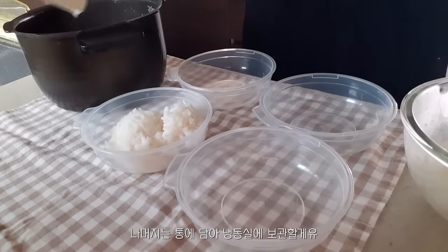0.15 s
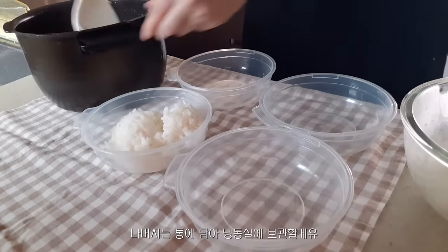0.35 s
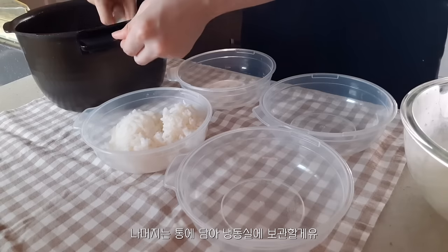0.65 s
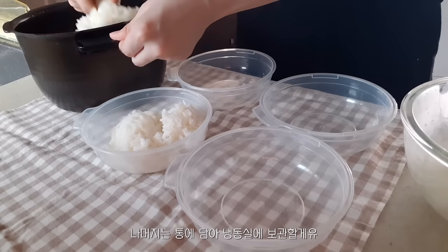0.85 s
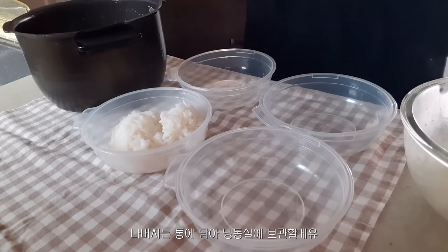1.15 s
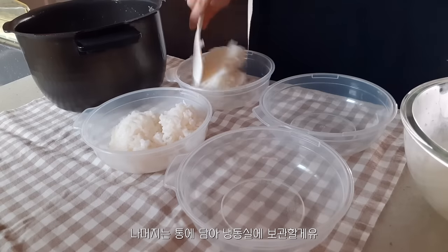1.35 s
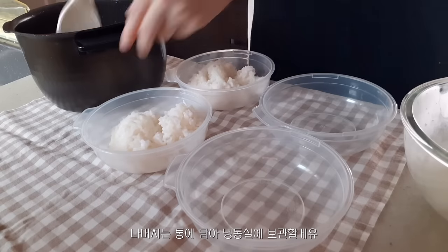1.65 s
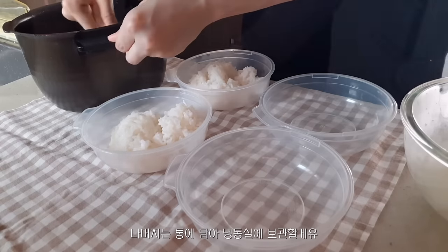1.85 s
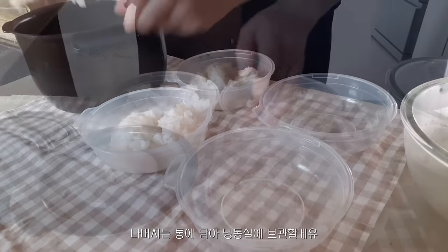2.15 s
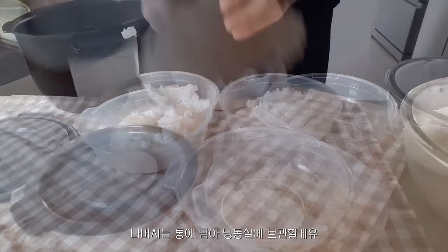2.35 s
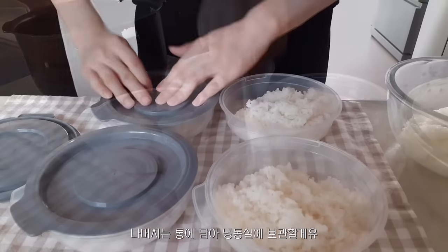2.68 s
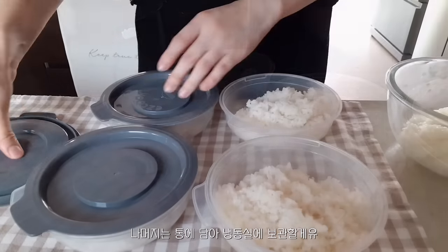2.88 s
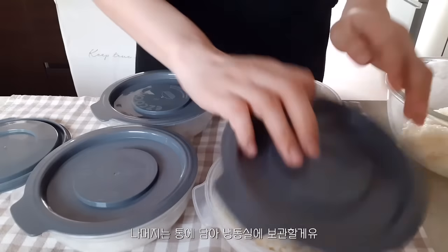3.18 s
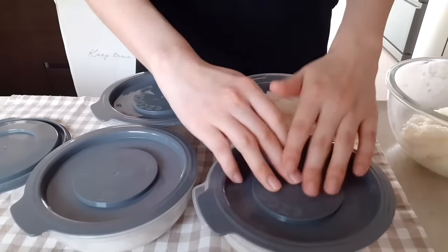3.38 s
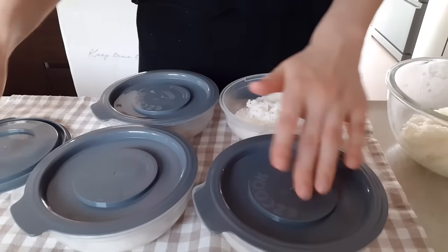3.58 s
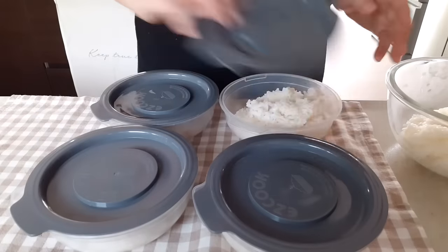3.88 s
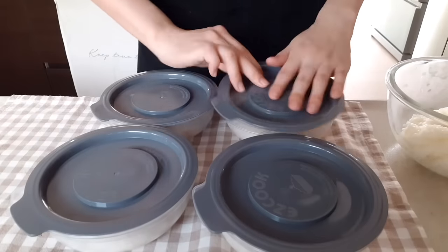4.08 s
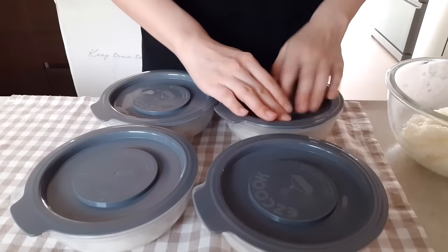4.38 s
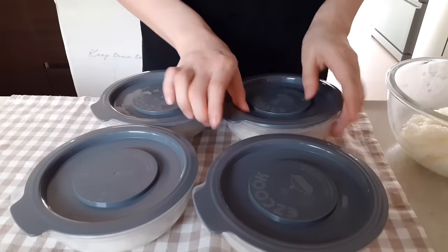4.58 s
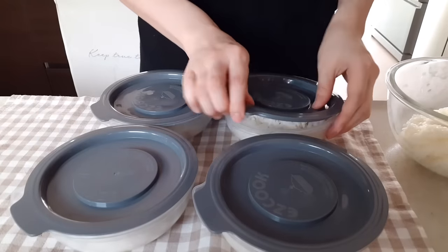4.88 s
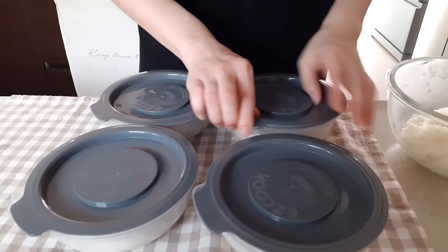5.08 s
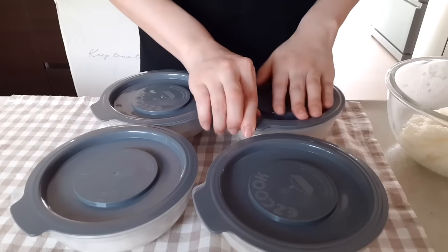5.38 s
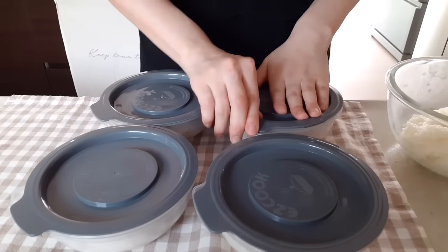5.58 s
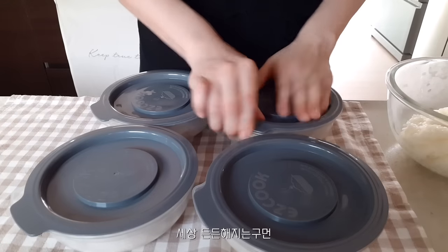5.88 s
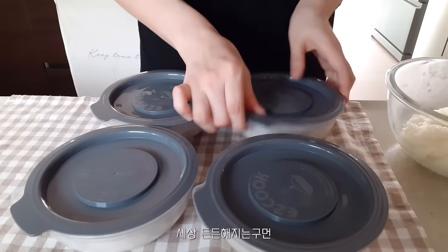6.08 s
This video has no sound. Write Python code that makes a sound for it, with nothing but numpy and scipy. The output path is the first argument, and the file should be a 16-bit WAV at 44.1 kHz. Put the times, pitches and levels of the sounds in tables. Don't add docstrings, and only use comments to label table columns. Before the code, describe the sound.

Plastic lids clatter, snap and squeak onto full rice tubs in quick sped-up bursts, then softer, slower presses over faint kitchen and fridge hum.

```python
import sys
import numpy as np
from scipy import signal
from scipy.io import wavfile
from scipy.ndimage import uniform_filter1d

SR = 44100
rng = np.random.default_rng(int(sys.argv[2]) if len(sys.argv) > 2 else 0)


def unload_audio(sound):
    columns = np.transpose(np.atleast_2d(sound))
    steps = np.round(np.clip(columns, -1, 1) * 32767)
    wavfile.write(sys.argv[1], SR, steps.astype(np.int16))


def to_linear_factor(level_db):
    exponent = np.asarray(level_db, float) / 20
    return 10 ** exponent


N = 274743


def evened(x):
    return x / np.sqrt(np.mean(x ** 2) + 1e-20)


def read(points, hz):
    f, value = np.transpose(points)
    return np.interp(np.log(hz + 1), np.log(f + 1), value)


def add(mix, s, sound):
    part = mix[:, round(s * SR):][:, :sound.shape[1]]
    part += sound[:, :part.shape[1]]


def pan(left_over_right_db):
    return to_linear_factor([[left_over_right_db / 2], [-left_over_right_db / 2]])


def band(x, lo_hz, hi_hz):
    return signal.sosfilt(signal.butter(2, [lo_hz, min(hi_hz, SR / 2.1)], "band", fs=SR, output="sos"), x)


def highpass(x, hz):
    return signal.sosfilt(signal.butter(2, hz, "high", fs=SR, output="sos"), x)


def resonate(x, hz, width_hz):
    turn = np.exp(2j * np.pi * np.cumsum(hz * np.ones(len(x))) / SR)
    r = np.exp(-np.pi * width_hz / SR)
    return 2 * (turn * signal.lfilter([1 - r], [1, -r], x / turn)).real


# (start [s], end [s])
FAST_S = (.628, 4.293)


def is_fast():
    t = np.arange(N) / SR
    return (t > FAST_S[0]) & (t < FAST_S[1])


# (frequency [Hz], side re mid [dB])
WIDE = [(60, -15.5), (180, -11.5), (550, -7), (1650, 0.5), (4970, 1.5), (15000, 1)]
BODY_WIDE = [(60, -5), (180, -14), (550, -13.5), (1650, -2), (4970, 2), (15000, 0)]


def hiss(colour, wide, patchy_db):
    frames, hz = N // 256 + 5, np.fft.rfftfreq(1024, 1 / SR)
    a, b, c, d, patches = rng.standard_normal((frames, 513, 5)).T
    patches = uniform_filter1d(patches, size=10, axis=0)
    patches = evened(uniform_filter1d(patches, size=12, axis=1))
    z = np.array([a + 1j * b, to_linear_factor(read(wide, hz))[:, None] * (c + 1j * d)])
    z = z * to_linear_factor(read(colour, hz)[:, None] + patchy_db * patches)
    mid, side = signal.istft(z, nperseg=1024, noverlap=768)[1][:, :N]
    return np.array([mid + side, mid - side]) / np.std(mid)


# (frequency [Hz], width [Hz], level [dB])
LID_MODES = [(700, 37, 1.5), (806, 90, -12), (1200, 1100, 11.5), (1700, 660, -7.5), (2070, 510, 10.5),
             (2808, 220, -12.5), (3600, 810, 8.5), (5000, 480, 2), (6760, 4500, 23), (9290, 400, -54)]


def snap(row, luck, pace, lid_db, pan_db, rattle_s):
    s, peak_db, hz, tick_db = row
    t, tick_hz = np.arange(2048) / SR, 1500 + 1500 * pace
    tooth, gap, wobble = luck[:2048], luck[2048:4096], luck[4096:]

    fade = np.exp(-t / (rattle_s * to_linear_factor(0.27 * (-25 - peak_db))))
    rattle = np.tanh(tooth) * (abs(gap) > .75) * fade
    drive = 0.39 * rattle + (t == 0)

    ring = resonate(drive, hz, hz / 3.2)
    modes, sign = 0, 1
    for (mode_hz, width_hz, db), g in zip(LID_MODES, wobble):
        f, width = mode_hz * pace / 2, width_hz * pace / 2
        near_db = -6.5 * abs(np.log2(f / hz))
        modes += sign * to_linear_factor(db + near_db + 2 * g) * resonate(drive, f * (1 + 0.01 * g), width) / width_hz
        sign = -sign
    body = ring / abs(ring).max() + to_linear_factor(lid_db) * modes / abs(modes).max()
    body = band(body, .3 * hz, max(2.6 * hz, tick_hz))
    body = to_linear_factor(peak_db - 1) * body / abs(body).max()

    aside = 2.2 * gap * (abs(tooth) > 1.3) * fade
    dull = np.exp(-2 * np.pi * 6340 / SR)
    tick = signal.lfilter([1], [1, -dull], [drive + .3 * aside, drive - .3 * aside])
    tick = band(tick, .6 * tick_hz, 15300)
    tick = to_linear_factor(peak_db + min(tick_db, 6)) * tick / abs(tick).max()

    pan_db = np.clip(pan_db + 1.5 * gap[-1], -8, 8)
    lag = round(-4 / pace - .6 * pan_db)
    body = np.array([np.roll(body, max(lag, 0)), np.roll(body, max(-lag, 0))])
    return s, (body - tick) * pan(pan_db)


# (time [s], peak [dB], main
# ring [Hz], tick re peak [dB])
SCOOP = [(0.644, -57, 380, -23), (0.955, -64, 260, -22), (1.734, -43.5, 410, 3.5), (1.809, -25, 1630, 6),
         (1.814, -23, 3500, -22), (1.834, -49, 800, -11), (1.929, -48, 780, -5), (2.039, -38, 3600, -5),
         (2.052, -24, 3550, -10), (2.056, -36, 1200, -19), (2.077, -24.5, 3800, -34),
         (2.091, -40.5, 840, 9), (2.148, -28.5, 3600, -29), (2.23, -53, 700, 18), (2.26, -38, 3850, -5),
         (2.274, -43.5, 1020, 10), (2.285, -38.5, 690, -8), (2.303, -42.5, 1640, 13), (2.372, -48, 3770, 0),
         (2.399, -37.5, 4070, -1.5)]
FIRST_LIDS = [(2.444, -16.5, 2880, -9), (2.451, -23, 2580, -10), (2.489, -24, 2820, -16),
              (2.513, -21, 2700, -5), (2.527, -14.5, 2870, -1.5), (2.588, -36, 1750, -7),
              (2.609, -8.5, 1566, -3), (2.809, -23.5, 3200, -2), (2.843, -32, 1320, 0),
              (2.85, -31, 1800, -7), (2.864, -45, 1760, 25), (2.874, -18, 5000, 1), (2.996, -47, 3310, -10),
              (3.011, -26, 1200, 5), (3.122, -30, 2580, -14), (3.142, -41.5, 2200, 9)]
NEAR_LID = [
    (3.218, -18, 1990, 1),
    (3.229, -31.5, 1900, -12.5),
    (3.336, -15, 2000, -1),
    (3.348, -20.5, 2870, -6),
    (3.457, -23.5, 1780, -18.5),
    (3.461, -14.5, 1600, -1),
    (3.586, -48.5, 2480, -3.5),
    (3.604, -42, 1000, -9),
    (3.625, -37, 750, -14),
]
LID_CATCHES = [(3.78, -37, 3080, -17), (3.785, -21, 3900, -5), (3.799, -35, 3400, 8), (3.877, -49, 4970, 3),
               (3.894, -18.5, 3370, 0), (3.969, -29, 900, 19), (3.992, -32, 900, -14), (4.021, -36, 910, 5.5),
               (4.028, -23.5, 2480, -5.5), (4.051, -26, 2150, -2.5), (4.083, -26.5, 2330, -2.5),
               (4.129, -20, 2320, -9.5), (4.157, -35, 2060, -14), (4.189, -25.5, 3480, -5),
               (4.194, -23.5, 2230, -13),
               (1.819, -15, 3800, -8.5),
    (2.141, -35, 1000, 5),
    (3.982, -29, 2500, -12),
]
PRESS = [(4.347, -52, 1395, -5.5), (4.381, -45.5, 1513, -27.5), (4.412, -50, 962, -16),
         (4.698, -58, 973, -16), (4.727, -51.5, 1048, 4), (4.987, -21.5, 1200, -22),
         (5.05, -37.5, 1565, -18.5), (5.057, -37.5, 987, -16.5), (5.168, -38, 1300, -24.5),
         (5.19, -43.5, 1060, -19), (5.254, -41.5, 980, -28), (5.262, -47, 1100, -23),
         (5.388, -29.5, 1400, -22), (5.454, -42.5, 1450, -19), (5.477, -36, 950, -10),
         (5.487, -35, 890, -2.5), (5.491, -31.5, 947, 0), (5.605, -37.5, 1240, -3), (5.611, -24, 642, -6),
         (5.822, -49, 1840, -3), (5.863, -22, 2630, 6), (5.89, -33.5, 1280, -25), (6.002, -42, 1170, 17),
         (6.007, -42.5, 1200, 11), (6.127, -39, 1340, 5), (6.141, -33, 1500, 4.5)]


def snaps(rows, pace, lid_db, pan_db, rattle_s):
    out = np.zeros((2, N))
    for row, luck in zip(rows, rng.standard_normal((len(rows), 4096 + len(LID_MODES)))):
        add(out, *snap(row, luck, pace, lid_db, pan_db, rattle_s))
    return out


# (time [s], frequency [Hz], peak [dB], t60 [s])
RINGS = [(0.888, 3400, -59, 0.073), (0.892, 7300, -63, 0.044), (1.814, 1450, -25.5, 0.035),
         (1.815, 4900, -31, 0.03), (1.815, 3750, -26.5, 0.023), (1.815, 3000, -33, 0.048),
         (1.818, 790, -31.5, 0.033), (1.818, 6800, -63, 0.027), (2.053, 3800, -51, 0.026),
         (2.077, 3100, -43, 0.033), (2.077, 3850, -47, 0.036), (2.092, 4200, -49, 0.018),
         (2.148, 3100, -49, 0.014), (2.165, 3200, -52, 0.015), (2.287, 750, -46, 0.025),
         (2.444, 3100, -22.5, 0.014), (2.446, 2550, -29, 0.042), (2.446, 1200, -37, 0.088),
         (2.513, 3200, -25, 0.011), (2.527, 3100, -31, 0.014), (2.53, 2000, -32.5, 0.053),
         (2.61, 684, -31, 0.067), (2.61, 571, -35, 0.042), (2.61, 1195, -29.5, 0.093),
         (2.612, 1900, -29.5, 0.092), (2.612, 2374, -27, 0.033), (2.61, 4893, -28.5, 0.027),
         (2.622, 1750, -30.5, .04), (2.809, 1750, -37, 0.057), (2.809, 3700, -49, 0.15),
         (2.823, 2400, -40.5, .03), (2.874, 4950, -31.5, 0.018), (2.893, 2000, -49, 0.026),
         (3.011, 1200, -33.5, 0.022), (3.017, 1260, -38.5, 0.079), (3.034, 3700, -45.5, 0.027),
         (3.122, 1250, -39.5, 0.019), (3.142, 1400, -38, 0.011), (2.613, 825, -32.5, 0.025),
         (2.825, 1500, -46, .04), (2.845, 963, -40.5, 0.022), (2.843, 3200, -43, 0.038),
         (3.02, 2450, -39, 0.04), (3.012, 910, -42.5, 0.038), (1.822, 4220, -42.5, 0.04),
         (1.83, 3080, -47, 0.087), (2.53, 4300, -30.5, 0.023), (2.623, 4640, -31, 0.02),
         (3.466, 265, -36, .13), (3.897, 1100, -46, .05)]
LATER_RINGS = [(3.219, 1160, -36, 0.082), (3.218, 2200, -33, .07), (3.222, 1780, -38, 0.09),
               (3.218, 797, -38, 0.09), (3.336, 2025, -24, 0.09), (3.337, 2446, -27.5, 0.085),
               (3.338, 3790, -35, 0.075), (3.35, 3120, -34, .04), (3.338, 1186, -35, 0.067),
               (4.191, 3695, -45, 0.08), (3.461, 428, -27, 0.03), (3.461, 685, -25.5, 0.037),
               (3.46, 880, -28, 0.054), (3.464, 1820, -35, 0.1), (3.463, 3725, -35.5, 0.091),
               (3.626, 700, -43, 0.03), (3.968, 3800, -41.5, 0.07), (3.979, 852, -34, 0.038),
               (3.993, 890, -40.5, .05), (4.008, 853, -41, 0.14), (4.028, 2430, -23, 0.016),
               (4.07, 1160, -48, .05), (4.194, 700, -42, 0.071), (4.194, 2150, -30.5, 0.018),
               (4.986, 1548, -35.5, .06), (4.987, 1035, -31.5, 0.035), (5.008, 960, -50, 0.065),
               (5.136, 1300, -54, .02), (5.168, 1010, -36, 0.019), (5.226, 945, -55.5, 0.026),
               (5.39, 1510, -41.5, .04), (5.389, 952, -45, 0.066), (5.397, 1560, -49, 0.037),
               (5.426, 1460, -61, 0.072), (5.454, 770, -47.5, 0.03), (5.466, 1560, -49, 0.15),
               (5.495, 1100, -41, 0.017), (5.61, 323, -27.5, 0.017), (5.864, 13500, -43, 0.04),
               (5.863, 960, -39, 0.027), (5.863, 2330, -31.5, .03), (5.864, 2900, -51, 0.016),
               (5.889, 900, -41, 0.014), (6.054, 1430, -55.5, .02), (3.461, 1058, -30, 0.019),
               (5.257, 1555, -52.5, 0.083), (5.274, 942, -62, 0.1), (5.318, 956, -56.5, .08),
               (6.005, 1120, -48, 0.036), (5.611, 150, -27, 0.038)]
# (pitch ratio [1], level [dB])
CLUSTER = [(1.037, -6), (.951, -7), (1.093, -10), (.887, -11)]


def rings(rows, pan_db, lag_samples):
    out = np.zeros((2, N))
    for s, hz, db, t60_s in rows:
        t = np.arange(0, t60_s, 1 / SR)
        fade = to_linear_factor(db - 60 * t / t60_s) * np.minimum(t * hz, 1)
        main = np.sin(2 * np.pi * hz * t)
        near = [to_linear_factor(under_db) * np.sin(2 * np.pi * hz * ratio * t) for ratio, under_db in CLUSTER]
        aside = 0.6 * (near[0] - near[1]) * np.array([[1], [-1]])
        add(out, s, fade * (main + sum(near) + aside))
    return np.array([out[0], np.roll(out[1], lag_samples)]) * pan(pan_db)


# (time [s], peak [dB], frequency [Hz])
THUDS = [(0.632, -47.5, 358), (0.948, -43, 323), (1.579, -49, 335), (1.731, -40, 432), (1.81, -27, 310),
         (1.835, -33.5, 227), (2.271, -42.5, 433), (2.399, -42, 220), (2.441, -38.5, 279),
         (2.608, -28.5, 266), (3.01, -39.5, 356), (3.218, -37, 320), (3.336, -33.5, 249),
         (3.462, -27.5, 275), (3.63, -47, 140), (3.97, -40.5, 215), (4.043, -40.5, 250), (4.191, -34, 260),
         (4.38, -43, 310), (4.987, -38.5, 390), (5.001, -44, 96.3), (5.493, -39, 285), (5.612, -32, 120),
         (5.863, -34.5, 287), (5.871, -39, 97.4), (6.13, -44, 291)]


def thuds():
    out, t = np.zeros((2, N)), np.arange(12288) / SR
    for (s, db, hz), luck in zip(THUDS, rng.standard_normal((len(THUDS), 12288))):
        fade_db = -60 * t * hz / 27
        push = np.sin(2 * np.pi * hz * t) * to_linear_factor(fade_db / 0.7)
        rumble = band(band(luck, 0.36 * hz, 2.6 * hz), 0.36 * hz, 2.6 * hz)
        rumble = evened(rumble) * to_linear_factor(fade_db)
        aside = .09 * evened(band(luck[::-1], .8 * hz, 2.6 * hz)) * to_linear_factor(fade_db) * np.array([[1], [-1]])
        onset = np.minimum(t / 0.0006, 1)
        add(out, s, to_linear_factor(db) * (aside - push + 0.5 * rumble) * onset * pan(-1.2))
    return out


# (time [s], length [s], first pitch [Hz], last pitch [Hz], peak [dB])
SQUEAKS = [
    (2.982, 0.0037, 13400, 14500, -38),
    (2.986, 0.0044, 15000, 15200, -37),
    (2.992, 0.0096, 14100, 13000, -40),
    (2.996, 0.003, 13100, 14600, -28.5),
    (2.997, 0.0063, 11500, 12200, -38),
    (3.748, 0.022, 10220, 14600, -35),
]
# (frequency [Hz], level [dB])
WHINE = [(3661, -80.5), (4258, -84), (5486, -85), (8516, -83), (9152, -87), (10982, -100)]
# (start [s], end [s])
WHINE_S = (1.485, 1.655)


def squeaks():
    out = np.zeros((2, N))
    for (s, length, first_hz, last_hz, db), luck in zip(SQUEAKS, rng.standard_normal((len(SQUEAKS), 2048))):
        t = np.arange(0, length, 1 / SR)
        pitch_hz = np.interp(t / length, [0, 0.76], [first_hz, last_hz])
        rough = evened(resonate(resonate(luck[:len(t)], pitch_hz, 3600), pitch_hz, 3600))
        tone = np.sin(2 * np.pi * np.cumsum(pitch_hz) / SR) + 0.55 * rough
        tone *= 1 + .5 * np.sin(2 * np.pi * 330 * t)
        swell = to_linear_factor(db - 12 * (2 * t / length - 1) ** 2) * signal.windows.tukey(len(t), .15)
        add(out, s, swell * tone * to_linear_factor([[-3.5], [2.5]]))
    t = np.arange(*WHINE_S, 1 / SR)
    squeal = sum(to_linear_factor(db + 6) * np.sin(2 * np.pi * hz * t) for hz, db in WHINE)
    add(out, WHINE_S[0], (squeal * signal.windows.tukey(len(t), .9))[None])
    return out


# (time [s], length [s],
# frequency [Hz], width [Hz], level [dB])
SCRAPES = [(0.598, 1.2, 5930, 1100, -77), (0.617, 1.1, 8300, 500, -84), (0.875, 0.042, 3580, 3050, -61),
           (2.253, 0.048, 3750, 2700, -53.5), (2.445, 0.11, 2623, 700, -45), (3.241, 0.11, 2000, 1200, -55),
           (3.263, 0.047, 4970, 1515, -53), (3.328, 0.27, 2150, 294, -59),
           (3.581, 0.085, 1350, 1200, -51.5), (3.713, 0.065, 4570, 2140, -54.5),
           (3.97, 0.05, 894, 88.5, -46), (4.693, 0.097, 1110, 700, -55), (5.02, 0.17, 1300, 1100, -59),
           (5.007, 0.18, 3800, 2530, -68.5), (5.471, 0.053, 1106, 1620, -42)]
MORE_SCRAPES = [
    (6.128, .07, 700, 900, -57),
    (4.79, .09, 980, 300, -62),
    (4.87, .055, 960, 350, -61),
    (4.52, .08, 900, 500, -66),
    (3.778, .055, 1280, 300, -52),
    (4.33, .04, 3700, 700, -70),
    (3.405, .03, 1600, 400, -55),
]


def scrapes(rows):
    out = np.zeros((2, N))
    for s, length, hz, width_hz, db in rows:
        noise = rng.standard_normal((3, 60000))[:, :round(length * SR)]
        slip = [resonate(resonate(noise[0] + ear, hz, width_hz), hz, width_hz) for ear in noise[1:]]
        grip = to_linear_factor(2.5 * evened(uniform_filter1d(noise[1], size=1500)))
        add(out, s, to_linear_factor(db) * evened(np.array(slip) * grip) * np.hanning(noise.shape[1]))
    return out


# (time [s], level [dB])
RUB = [(0.631, -63.5), (1.82, -63.5), (2.42, -61.5), (2.69, -85), (2.83, -46.5), (3.13, -90), (3.35, -53),
       (3.44, -46.5), (3.57, -78), (3.92, -63.5), (4.05, -71), (4.22, -52), (4.288, -75), (4.343, -50),
       (4.6, -90), (5.18, -72), (5.92, -69.5), (6.1, -99)]
# (frequency [Hz], level [dB])
RUB_BODY = [(400, -12), (900, 9.5), (1500, 1.5), (2200, -9), (3800, -9.5), (6000, -26.5)]
RUB_HISS = [(2500, -19.5), (4000, 14), (6200, -9), (9000, 2), (13000, -0.5), (16000, -11)]


def rub():
    s, db = np.transpose(RUB)
    t = np.arange(N) / SR
    slips = to_linear_factor(1.2 * rng.exponential(1, N)) * (rng.random(N) < .02)
    grain = evened(uniform_filter1d(slips, size=60) + 0.43)
    pressure = (t > s[0]) * grain * to_linear_factor(np.interp(t, s, db) - 8)
    body = hiss(RUB_BODY, BODY_WIDE, patchy_db=2.5)
    hiss_gain = to_linear_factor(np.where(is_fast(), -12.5, -32))
    return pressure * (body + hiss_gain * hiss(RUB_HISS, WIDE, patchy_db=2.5))


# (frequency [Hz], left-right likeness [1])
SAME = [(100, 0.47), (500, 0.63), (1500, 0.032), (4000, 0.11), (12000, 0.92)]
# (frequency # [Hz], t60 [s])
KITCHEN = [(200, 0.26), (530, 0.27), (1400, 0.22), (3700, 0.25), (9700, 0.21)]
CALM_KITCHEN = [(300, .29), (1200, .26), (3100, .29), (8000, .24), (14000, .2)]


def kitchen(x, pace, from_s, decays):
    out = np.zeros((2, N))
    for turn in range(3):
        taps = np.zeros((2, SR // 3))
        at = np.arange(60, SR // 3 - 12, 12) + rng.integers(0, 12, (2, (SR // 3 - 61) // 12))
        np.put_along_axis(taps, at, rng.choice([-1., 1.], at.shape), 1)
        hz, t, z = signal.stft(taps, SR, nperseg=128)
        same = read(SAME, hz)[:, None]
        z[1] = same * z[0] + np.sqrt(1 - same ** 2) * z[1]
        fade = to_linear_factor(-60 * t * pace / read(decays, hz / pace)[:, None])
        tail = signal.istft(z * fade, SR, nperseg=128)[1]
        share = np.cos(2 * np.pi * (np.arange(N) / SR * 47 + turn / 3)) * np.sqrt(2 / 3)
        busy = (x.mean(0) * share)[round(from_s * SR):][:4 * SR]
        add(out, from_s, signal.oaconvolve(busy[None], tail / np.linalg.norm(tail[0]), axes=1))
    return out


# (frequency [Hz], level [dB])
HUM = [(51, -68.5), (102, -70.5), (156, -69.5), (204, -70.5), (304, -75), (347, -77), (385, -75.5),
       (611, -90.5), (714, -84)]


def hum(fast, late):
    t, turns = np.arange(N) / SR, np.cumsum(1. + fast) / SR
    knots = np.arange(0, 2 * t[-1], .045)
    lines = []
    for (hz, db), luck in zip(HUM, rng.standard_normal((len(HUM), len(knots)))):
        waver = np.interp(turns, knots, 1 + 0.45 * luck)
        lines.append(to_linear_factor(db) * waver * np.sin(2 * np.pi * hz * turns))
    return sum(lines[1:]) + lines[0] * np.where(fast, late, 1)


# (frequency [Hz], density [dB/Hz])
AIR = [(15, -34), (25, -28.5), (104, -2.5), (184, -15), (226, -19), (284, -13), (420, -32.5), (504, -29.5),
       (1260, -31), (1520, -23.5), (1780, -36.5), (2040, -30.5), (2750, -42.5), (3160, -37.5), (6000, -49),
       (7800, -83), (13200, -120)]
EARLY_AIR = [(24, -22), (40, -14), (118, -28), (196, 6.5), (265, 1), (406, 10), (564, -1.5), (690, 5),
             (933, -34), (1200, -4), (2430, -57), (6180, -15), (7180, -29), (15300, -30.5), (16500, -48)]
LATER_AIR = [(24, -25), (70, -9), (130, -1), (417, 6.5), (957, -32.5), (1170, -40.5), (1430, -46),
             (2090, -13.5), (2760, -49), (3730, -18), (4560, -27), (10500, -28), (15300, -29.5),
             (16500, -68)]
# (start [s], end [s])
CROSSFADE_S = (1.72, 2.15)


def air():
    fast, t = is_fast(), np.arange(N) / SR
    late = np.interp(t, CROSSFADE_S, [0, 1])
    quick = np.sqrt(1 - late) * to_linear_factor(-61) * hiss(EARLY_AIR, BODY_WIDE, patchy_db=2.0)
    quick += np.sqrt(late) * to_linear_factor(-59.5) * hiss(LATER_AIR, WIDE, patchy_db=0)
    calm = to_linear_factor(-60) * hiss(AIR, WIDE, patchy_db=2.0)
    return np.where(fast, quick, calm) * pan(-1.8) + hum(fast, late)


def scene():
    fast = snaps(SCOOP, 2, lid_db=0.5, pan_db=-6.0, rattle_s=0.0037)
    fast += snaps(FIRST_LIDS, 2, lid_db=2.5, pan_db=-3.0, rattle_s=0.0024)
    fast += snaps(NEAR_LID, 1.93, lid_db=-2.0, pan_db=4.1, rattle_s=0.0041)
    fast += snaps(LID_CATCHES, 2, lid_db=5.0, pan_db=1.0, rattle_s=0.0032)
    slow = snaps(PRESS, 0.913, lid_db=-4.0, pan_db=2.5, rattle_s=0.0036)
    ring = rings(RINGS, pan_db=-2.5, lag_samples=0) + rings(LATER_RINGS, pan_db=-.6, lag_samples=4)
    fast, slow = fast + ring * is_fast(), slow + ring * ~is_fast()
    squeak = squeaks()
    room = to_linear_factor(-6.5) * kitchen(fast + 0.72 * squeak, 1.35, FAST_S[0], KITCHEN)
    room += to_linear_factor(-2.5) * kitchen(slow, 1, FAST_S[1], CALM_KITCHEN)
    handling = thuds() + squeak + scrapes(SCRAPES) + scrapes(MORE_SCRAPES) + rub()
    return fast + slow + handling + room + air()


def band_limit(x):
    return signal.sosfilt(signal.butter(12, 16990, fs=SR, output="sos"), x)


# (frequency [Hz], density [dB/Hz])
MIC = [(2940, -23), (5000, 9.5), (6350, 0), (8790, -7), (15200, 8), (16200, -6), (16500, -20)]


def record(dry):
    dip = signal.lfilter(*signal.iirnotch(9000, 2.5, SR), dry)
    calm = highpass(0.54 * dip + 0.22 * dry, 24)
    calm += to_linear_factor(-83) * hiss(MIC, WIDE, patchy_db=1.0)
    quick = highpass(dry, 95)
    top = signal.firwin(63, 16100, fs=SR)
    mic = signal.oaconvolve(np.where(is_fast(), quick, calm), top[None], "same")
    from_change_s = abs(np.arange(N) / SR - FAST_S[1] - .003)
    mic = mic * np.clip(from_change_s / .004 - .6, .04, 1)
    return band_limit(mic)


dry = scene()
out = record(dry)
unload_audio(out)
```